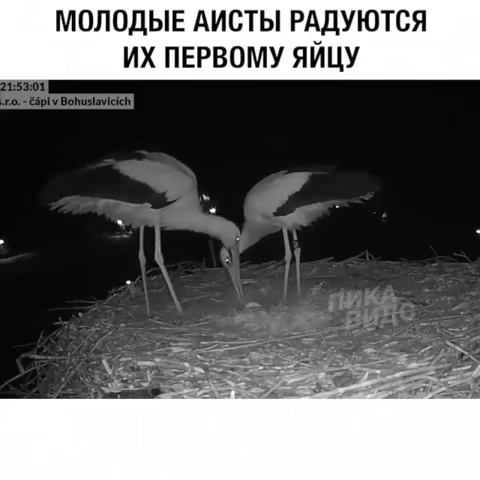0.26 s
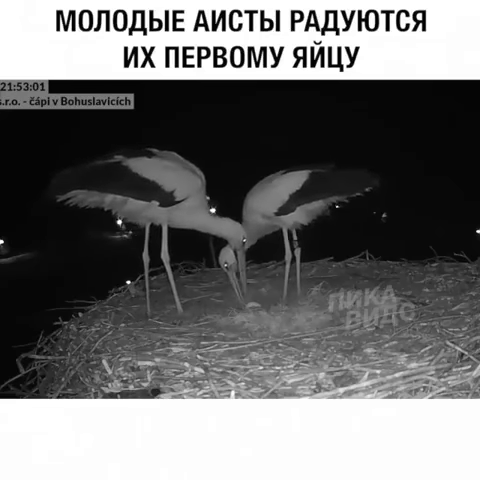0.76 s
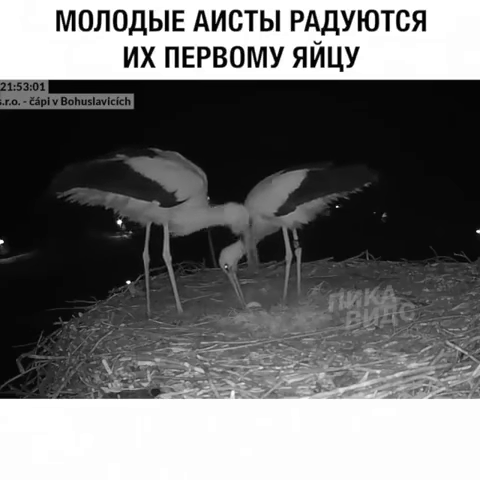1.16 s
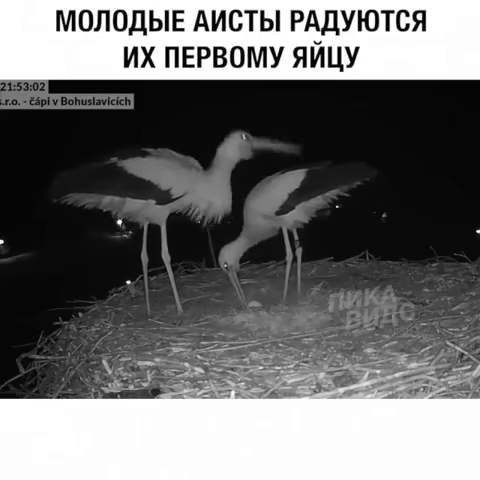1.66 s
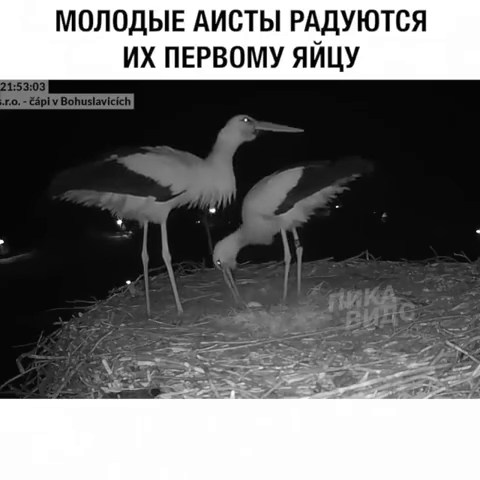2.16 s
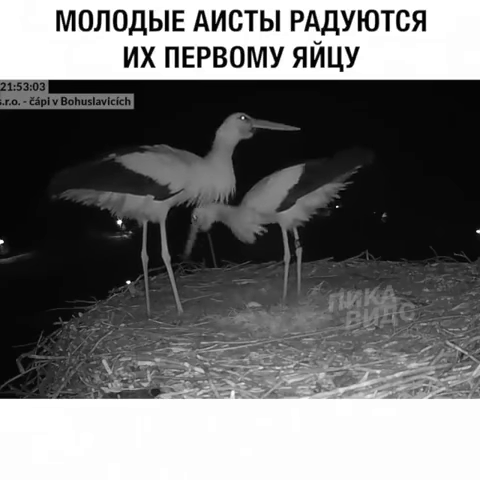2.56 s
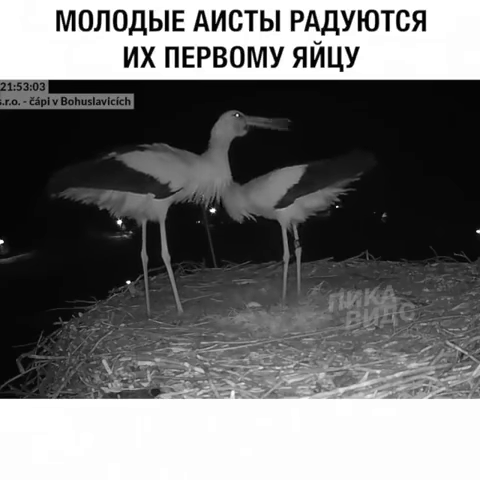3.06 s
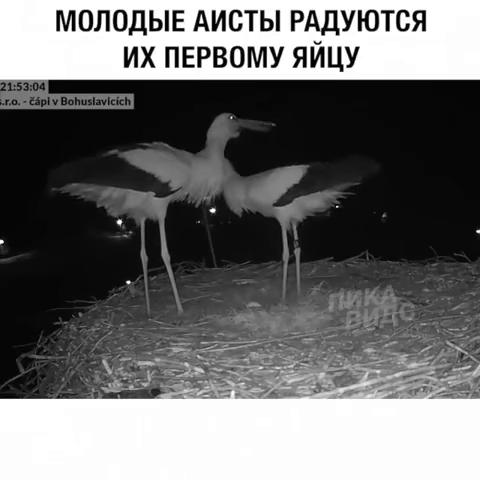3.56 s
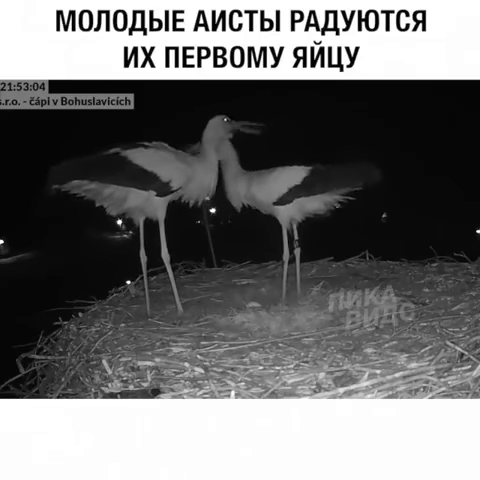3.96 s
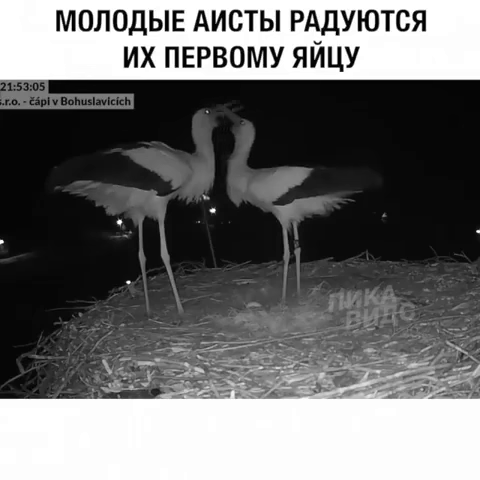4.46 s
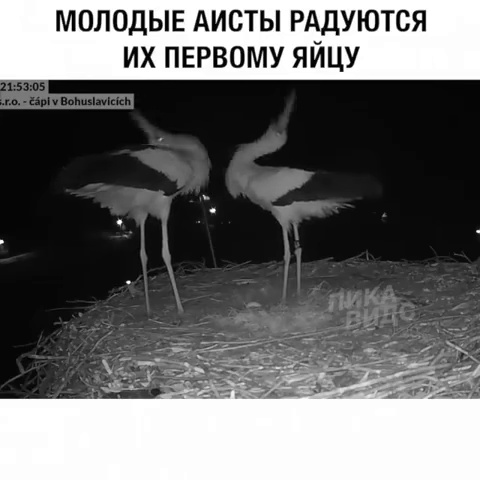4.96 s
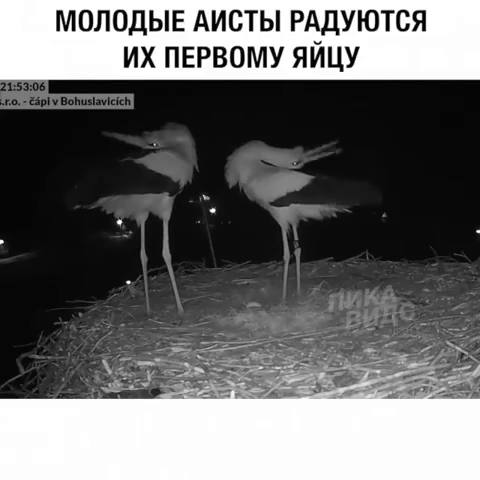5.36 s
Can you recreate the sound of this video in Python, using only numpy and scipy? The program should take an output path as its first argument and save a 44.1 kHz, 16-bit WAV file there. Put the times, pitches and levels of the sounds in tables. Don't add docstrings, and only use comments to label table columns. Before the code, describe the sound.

Close microphone at a twig nest, quiet low traffic hum behind. Short airy hisses come first, with dull low thuds from shifting feet. Just before two seconds, hard woody claps begin, swelling quickly to a regular rattle. Another bird's claps enter near three seconds at a different pace, and the two interlock, loud and slightly distorted, until the cut.

```python
import sys
import numpy as np
from scipy import signal
from scipy.fft import rfft, irfft, next_fast_len
from scipy.io import wavfile
from scipy.ndimage import uniform_filter1d, map_coordinates

SR = 44100
rng = np.random.default_rng(int(sys.argv[2]) if len(sys.argv) > 2 else 0)


def volts_from_db(level):
    exponent = np.asarray(level, float) / 20
    return 10 ** exponent


def generate_wav(sig):
    pcm = np.round(np.clip(np.atleast_2d(sig).T, -1, 1) * 32767).astype(np.int16)
    wavfile.write(sys.argv[1], SR, pcm)


N = 246959

# pitch_hz, density_db_per_hz
NIGHT_SPECTRUM = [(18, -40), (30, -15.5), (100, -12.5), (240, -7.5), (420, -4), (700, -2.5), (1200, -7.5),
                  (2000, -8), (2800, -16.5), (4000, -22.5), (5200, -31.5), (8000, -39.5), (11500, -39),
                  (13000, -82)]
# start_s, level_db, pitch_hz
STEPS = [
    (.06, -50, 70),
    (0.839, -43, 50),
    (1.455, -43, 50),
    (1.57, -55, 55),
    (1.809, -36.5, 80.6),
    (4.27, -42, 55),
    (4.328, -48, 50),
    (4.45, -44, 55),
]
# start_s, length_s, level_db, middle_hz, air_db
PANTS = [
    (0.392, .12, -40, 2230, -15),
    (0.61, 0.11, -35, 1885, -27),
    (0.875, 0.11, -38.5, 2300, -13.5),
    (1.058, 0.088, -39.5, 2800, -20),
    (1.41, 0.099, -36, 2370, -15),
    (1.726, 0.095, -37, 2300, -14.5),
    (2.077, 0.095, -38.5, 2300, -15),
    (2.47, .06, -53, 2450, -18),
]
# start_s, length_s, level_db, middle_hz, pipe_db
WHEEZES = [
    (1.256, 0.074, -36, 2530, -1),
    (1.493, 0.077, -41.5, 2100, 6.5),
    (2.275, 0.071, -43.5, 2270, 5),
    (1.2, 0.057, -60, 2500, 12),
]
# pitch_hz, level_db
BREATH_AIR = [(1500, 0.5), (2600, 4), (4500, 3), (6000, -7), (8800, -15), (10500, -17.5), (12000, -32)]
# pitch_hz, level_db
CRACK_SPECTRUM = [(1500, -7), (3500, 10), (5000, -1), (7000, -16), (10500, -22), (12000, -39)]
# pitch_hz, level_db
SMEAR_SPECTRUM = [(400, -0.5), (900, -5.5), (2500, 1.5), (4000, -6), (6000, -19), (10500, -29),
                  (12000, -30)]
# start_s, peak_db
TOUCHES = [
    (2.420, -42),
    (2.591, -33.5),
    (4.387, -36),
    (4.609, -38),
    (4.675, -33),
    (5.022, -36),
    (5.149, -26),
    (5.463, -26.5),
    (5.577, -30),
]
# start_s, peak_db, crack_db
FAR_CLAPS = [(2.9274, -24, -10), (3.086, -17.5, -14), (3.238, -11, -24), (3.3876, -8.5, -25),
             (3.5341, -8, -26), (3.677, -7, -45), (3.8205, -7, -38), (3.9624, -9, -34), (4.0999, -8, -21.5),
             (4.235, -5, -20), (4.368, -4.5, -21.5), (4.4937, -7, -14), (4.6242, -3.5, -16),
             (4.7514, -4.5, -15.5), (4.8773, -2.5, -17), (4.9994, -3, -15.5), (5.1186, -1.5, -16.5),
             (5.2399, -2, -25.5), (5.3595, -0.5, -28), (5.4749, 0.5, -27), (5.5924, -0.5, -17)]
# start_s, peak_db, crack_db
NEAR_FORWARD_CLAPS = [(1.8235, -29, -9), (1.9705, -11, -17), (2.1081, -5, -24), (2.2428, -2.5, -45),
                      (2.3767, -2.5, -23), (2.511, -2, -23), (2.6422, -1.5, -22.5), (2.7723, -2, -24),
                      (2.9023, -1, -29), (3.0333, -1, -31), (3.1664, -1.5, -27), (3.2984, -0.5, -27),
                      (3.4289, -1, -23), (3.5599, -1.5, -22.5), (3.693, -6, -26), (3.8271, -2.5, -37),
                      (3.9554, -2, -24), (4.0842, -1.5, -26)]
# start_s, peak_db, crack_db
NEAR_THROWN_CLAPS = [(4.2107, 0, -26), (4.3335, 2, -24.5), (4.4581, 1, -31), (4.582, 0, -19.5),
                     (4.7005, -1, -28), (4.808, -1.5, -22), (4.9203, -1.5, -23), (5.032, -2.5, -30),
                     (5.1371, 1, -18.5), (5.2393, 5.5, -23), (5.3404, 2, -17.5), (5.442, 2.5, -17),
                     (5.5425, 2, -17.5)]
# time_s, low_hz, second_hz, third_hz, third_db
NEAR_NECK = [(1.8, 734, 1680, 2390, 0.5), (2.3, 700, 1630, 2350, -6.5), (3, 698, 1690, 2430, -6.5),
             (3.7, 707, 1780, 2496, -6.5), (4.1, 730, 1772, 2540, -7.5), (4.2, 712, 1702, 2580, -19),
             (4.75, 789, 1835, 2740, -13.5), (4.978, 842, 1765, 2740, -17), (5.15, 800, 1557, 2670, -20),
             (5.3, 837, 1615, 2670, -17), (5.6, 812, 1520, 2670, -12)]
# time_s, low_hz, second_hz, third_hz, third_db
FAR_NECK = [(2.9, 718, 1590, 2410, 3), (3.4, 702, 1586, 2340, 4.5), (3.8, 743, 1622, 2330, 4.5),
            (4.2, 743, 1594, 2470, 2), (4.5, 770, 1695, 2575, 1.5), (4.9, 794, 1716, 2560, 0.2),
            (5.1, 830, 1660, 2594, 1.5), (5.35, 869, 1632, 2545, 0), (5.6, 836, 1596, 2450, -0.6)]
# multiple_of_second, level_db, t60_s
NEAR_FORWARD_BILL = [(1.7, -17, 0.0055), (1.87, -14, 0.0071), (2.15, -12.5, 0.0062), (2.4, -21.5, 0.006),
                     (3.15, -22, 0.0023)]
# multiple_of_second, level_db, t60_s
NEAR_THROWN_BILL = [(1.8, -13.5, 0.0053), (2.08, -18, 0.0071), (2.35, -25, 0.0075), (2.9, -12, 0.0025),
                    (3.5, -16.5, 0.0032)]
# multiple_of_second, level_db, t60_s
FAR_BILL = [(1.95, -13, 0.0092), (2.15, -14, 0.0025), (2.41, -12, 0.0064), (2.7, -29, 0.013),
            (3.4, -22.5, 0.0024)]


def unit(x):
    return x / np.sqrt(np.mean(x ** 2) + 1e-20)


def filtered(x, response):
    m = next_fast_len(x.shape[-1] + 4096)
    spectrum = rfft(x, m) * response(np.fft.rfftfreq(m, 1 / SR))
    return irfft(spectrum, m)[..., :x.shape[-1]]


def colour(points):
    point_hz, level_db = np.transpose(points)
    return lambda hz: volts_from_db(np.interp(np.log(hz + 1), np.log(point_hz + 1), level_db))


def hollow(hz, width_hz):
    return lambda f: 1j * f * width_hz / (hz * hz - f * f + 1j * f * width_hz)


def add(track, start_s, sound):
    track[round(start_s * SR):][:len(sound)] += sound


def night():
    z = signal.stft(rng.standard_normal(N), nperseg=512)[2]
    patches = uniform_filter1d(rng.standard_normal(z.shape), 6, 0)
    patches = uniform_filter1d(patches, 14, 1)
    air = signal.istft(z * volts_from_db(1.36 * unit(patches)), nperseg=512)[1][:N]
    return volts_from_db(-44.89) * unit(filtered(air, colour(NIGHT_SPECTRUM)))


def steps():
    track, t = np.zeros(N + SR), np.arange(3000) / SR
    attack, t60_s = 1 - np.exp(-t / 0.0018), 0.067
    for start_s, level_db, hz in STEPS:
        add(track, start_s, volts_from_db(level_db - 60 * t / t60_s) * np.sin(2 * np.pi * hz * t) * attack)
    return track[:N]


def breaths():
    rows = []
    for start_s, length_s, level_db, hz, air_db in PANTS:
        low_db = min(-6.5 + 9 * start_s, 8)
        middle_db = max(2.5 - 0.0176 * (hz - 2300), 1)
        rows.append((start_s, length_s, level_db, 0.495 * hz, hz, 3312,
                     low_db, middle_db, -40.5, air_db, -1.5))
    for start_s, length_s, level_db, hz, pipe_db in WHEEZES:
        rows.append((start_s, length_s, level_db, 0.44 * hz, hz, hz + 700,
                     pipe_db, pipe_db, -16.5, pipe_db - 16.5, -10))
    return rows


def panting():
    track = np.zeros(N + SR)
    for (start_s, length_s, level_db, low_hz, middle_hz, mouth_hz,
         low_db, middle_db, whistle_db, air_db, spread_db) in breaths():
        width = np.clip(0.33 - 0.098 * start_s, .06, 1)

        def pipe(f):
            low = volts_from_db(low_db) * hollow(low_hz, width * low_hz)(f) ** 2
            return low + volts_from_db(middle_db) * hollow(middle_hz, width * middle_hz)(f) ** 2

        def mouth(f):
            spread = np.exp(-((f - mouth_hz) / 850) ** 2 * (1 + (f > mouth_hz)))
            whistle = hollow(6300, 1300)(f) ** 2
            return (hollow(mouth_hz, 420)(f) ** 2 + volts_from_db(spread_db) * spread
                    + volts_from_db(whistle_db) * whistle + volts_from_db(air_db) * colour(BREATH_AIR)(f))

        phase = np.arange(round(length_s * SR)) / (length_s * SR)
        for response, lateness in ((mouth, .85), (pipe, 1.1)):
            flutter = map_coordinates(rng.standard_normal(12), [phase * length_s * 70])
            flow = np.sin(np.pi * phase ** lateness) ** .8 * volts_from_db(1.8 * flutter)
            noise = filtered(rng.standard_normal(len(phase)), response)
            add(track, start_s, volts_from_db(level_db + 9.5) * flow * noise)
    return track[:N]


def smear():
    t = np.arange(800) / SR
    shape_db = np.interp(t, [0, .004, .0045, .013, .016], [-26.0, -4.5, 1.5, -4.0, -25])
    return volts_from_db(shape_db) * unit(filtered(rng.standard_normal(800), colour(SMEAR_SPECTRUM)))


def crack(t60_s):
    t = np.arange(1000) / SR
    burst = filtered(rng.standard_normal(1000), colour(CRACK_SPECTRUM)) * volts_from_db(-60 * t / t60_s)
    return burst / np.linalg.norm(burst) * np.sqrt(t60_s * SR / np.log(1e6))


def touches():
    track = np.zeros(N + SR)
    for start_s, peak_db in TOUCHES:
        add(track, start_s, volts_from_db(peak_db - 4) * crack(.01))
        add(track, start_s - .004, volts_from_db(peak_db - 13) * smear())
    return track[:N]


def clatter(claps, neck, bill, throat_db, throat_loss_db_per_db, t60s, snap_hz, snap_t60_s, snap_db, lag_s):
    track, t = np.zeros(N + SR), np.arange(-16, 1000) / SR
    after = np.maximum(t, 0)
    onset = np.clip(1 + t / .00035, 0, 1) ** 2
    swell = onset * (1 + 4000 * after)
    throat_fill = onset * (1 - np.exp(-np.abs(t) / 0.00029))
    snap = volts_from_db(snap_db - 60 * after / snap_t60_s) * np.cos(2 * np.pi * snap_hz * t + 0.035)
    neck_s, *postures = np.transpose(neck)
    for start_s, peak_db, crack_db in claps:
        low_hz, second_hz, third_hz, third_db = [np.interp(start_s, neck_s, p) for p in postures]
        modes = [(second_hz, 0, t60s[1]), (third_hz, third_db - 0.5, t60s[2])]
        for multiple, level_db, t60_s in bill:
            hz = multiple * second_hz * rng.normal(1, 0.019)
            modes.append((hz, level_db + rng.normal(0, 1.0), t60_s))
        ring = sum(volts_from_db(level_db - 60 * t / t60_s) * np.cos(2 * np.pi * hz * (t - lag_s) + 1.914)
                   for hz, level_db, t60_s in modes)
        low_db = throat_db - throat_loss_db_per_db * peak_db + 17
        throat = volts_from_db(low_db - 60 * t * (low_hz / 700) ** 2 / t60s[0]) * throat_fill
        throat = throat * np.cos(2 * np.pi * low_hz * t + 0.75)
        add(track, start_s + .0003, volts_from_db(peak_db - 11) * (swell * (ring + snap) + throat))
        add(track, start_s + .0005, volts_from_db(peak_db + crack_db + 6.5) * crack(0.0063))
        back_s = start_s + 0.00051 + 1 / low_hz
        add(track, back_s, volts_from_db(peak_db + crack_db + 0.5) * crack(0.0097))
        add(track, start_s - .0037, volts_from_db(peak_db - 27.5) * smear())
    return track[:N]


def far_bird():
    return clatter(FAR_CLAPS, FAR_NECK, FAR_BILL, throat_db=-17, throat_loss_db_per_db=0.68,
                   t60s=(.03, .009, .0088), snap_hz=2810, snap_t60_s=0.0028, snap_db=7.5, lag_s=0.00022)


def near_bird(claps, bill):
    return clatter(claps, NEAR_NECK, bill, throat_db=-13.5, throat_loss_db_per_db=0.52,
                   t60s=(.026, .0085, .009), snap_hz=1999, snap_t60_s=0.0035, snap_db=5.5, lag_s=0.00028)


def nest(x):
    t = np.arange(500) / SR
    twigs = rng.standard_normal(500) * volts_from_db(-60 * t / .009)
    twigs = np.pad(twigs, (round(.007 * SR), 0))
    return signal.fftconvolve(x, twigs / np.linalg.norm(twigs))[:N]


def scene():
    near = near_bird(NEAR_FORWARD_CLAPS, NEAR_FORWARD_BILL) + near_bird(NEAR_THROWN_CLAPS, NEAR_THROWN_BILL)
    bills = near + far_bird() + touches()
    bills = filtered(bills, lambda hz: 1 / np.sqrt(1 + (420 / (hz + 1)) ** 8))
    mono = night() + steps() + panting() + volts_from_db(-22) * nest(bills) + bills
    return np.array([mono, mono])


def overload(x):
    limited = x / (1 + np.abs(x) ** 12) ** (1 / 12)
    excess = np.maximum(np.abs(x) - 1.05, 0)
    thump = filtered(excess, lambda hz: 1j * hz / (25 + 1j * hz) / (1 + 1j * hz / 450) ** 2)
    return limited + volts_from_db(-13.0) * thump


def holes(x):
    hz, t, z = signal.stft(x, SR, nperseg=1024)
    chance = rng.random((len(hz) // 5 + 1, len(t) // 4 + 1))
    chance = np.kron(chance, np.ones((5, 4)))[:len(hz), :len(t)]
    odds = np.interp(hz, [4000, 6500, 8000, 12000], [.02, .1, .3, .3])[:, None]
    weak = uniform_filter1d(np.abs(z), size=8, axis=0) < volts_from_db(-92)
    return signal.istft(z * np.where((chance < odds) & weak, .08, 1), SR, nperseg=1024)[1][:N]


def flicker(x, level_db):
    hz, t, z = signal.stft(x, SR, nperseg=1024)
    blocks = rng.random((len(hz) // 24 + 1, len(t) // 3 + 1)) < .3
    treble = (hz > 4000) * (hz < 10500)
    gate = np.kron(blocks, np.ones((24, 3)))[:len(hz), :len(t)] * treble[:, None]
    turn = np.exp(2j * np.pi * rng.random(z.shape))
    return volts_from_db(level_db) * signal.istft(z * gate * turn, SR, nperseg=1024)[1][:N]


def band_limit(x):
    return signal.sosfilt(signal.butter(12, 12350, fs=SR, output="sos"), x)


def record(dry):
    top_hz, slope_db_per_hz, floor_db = 11250, -.014, -16
    x = overload(dry[0])
    x = filtered(x, lambda hz: volts_from_db(np.maximum(slope_db_per_hz * np.maximum(hz - top_hz, 0), floor_db)))
    x = holes(x)
    side = flicker(x, level_db=-8)
    mix = np.clip(x - .0024, -1, 1) + np.array([side, -side])
    return band_limit(mix)


dry = scene()
out = record(dry)
generate_wav(out)
```